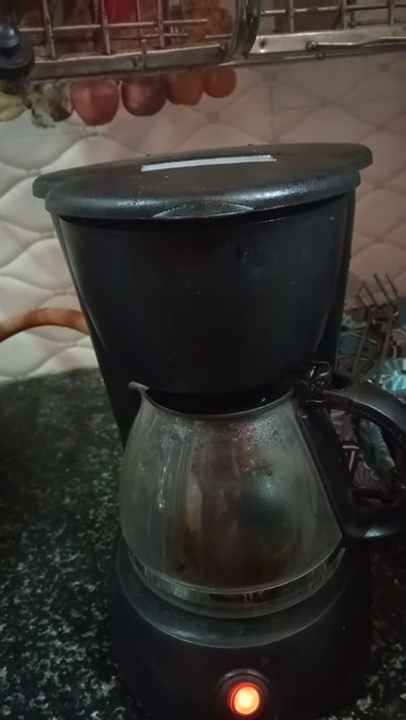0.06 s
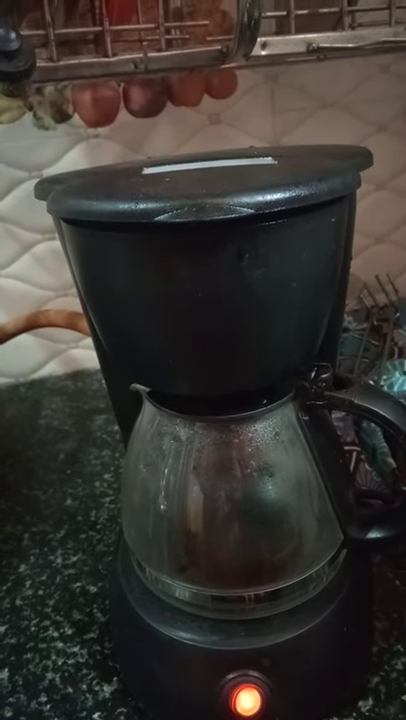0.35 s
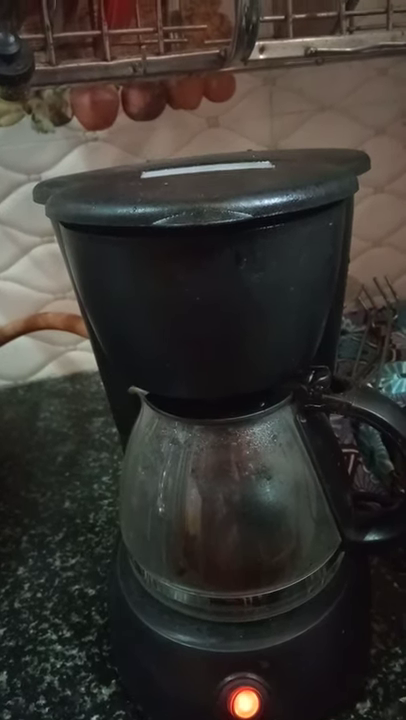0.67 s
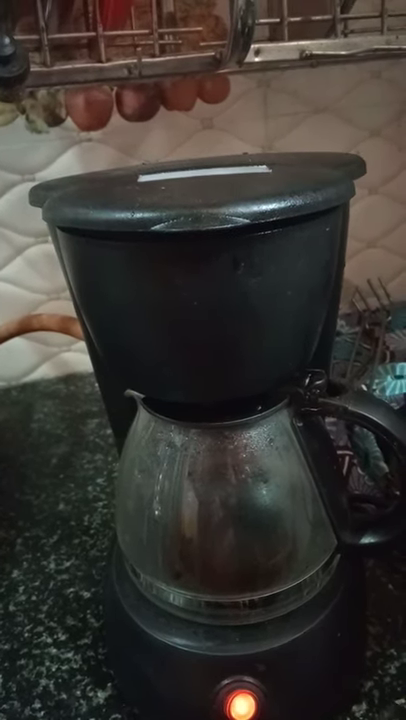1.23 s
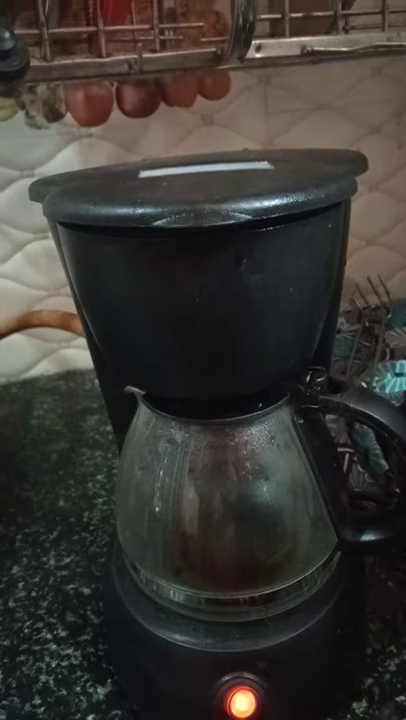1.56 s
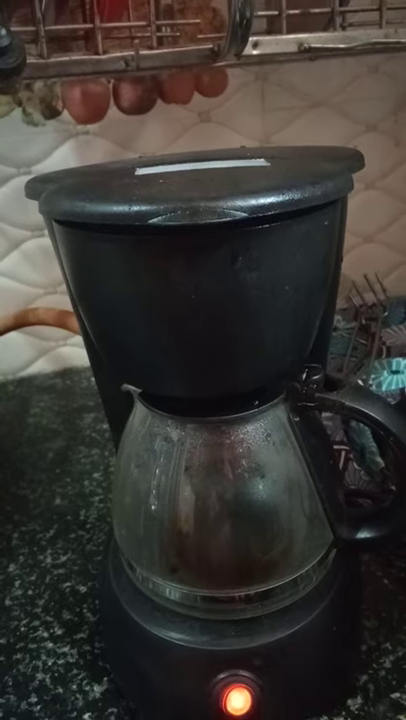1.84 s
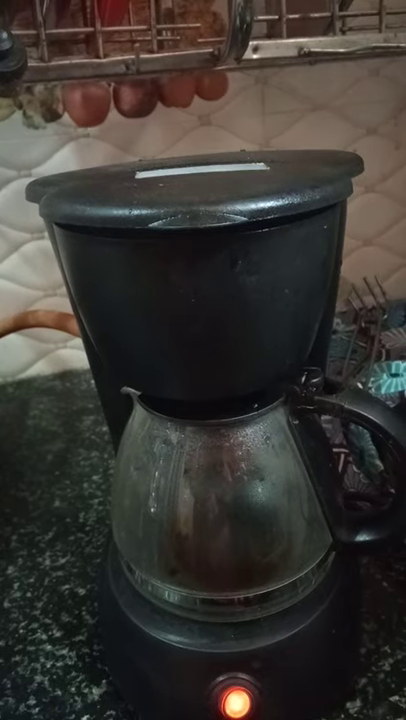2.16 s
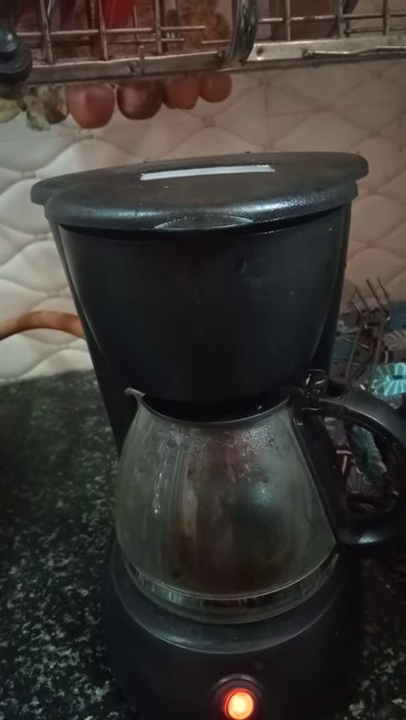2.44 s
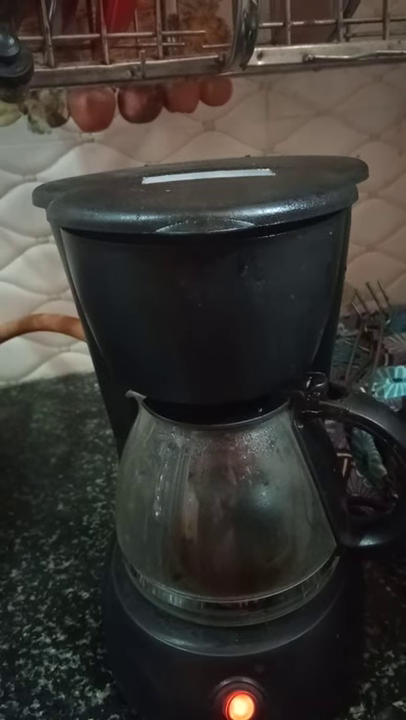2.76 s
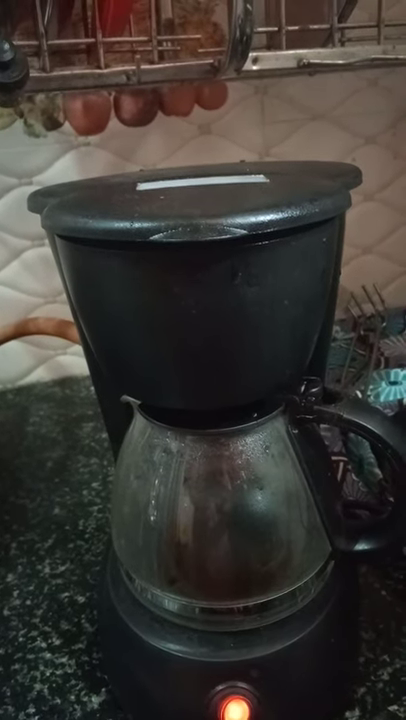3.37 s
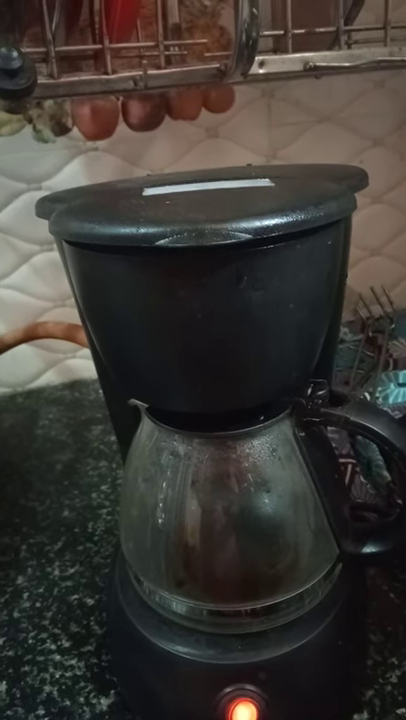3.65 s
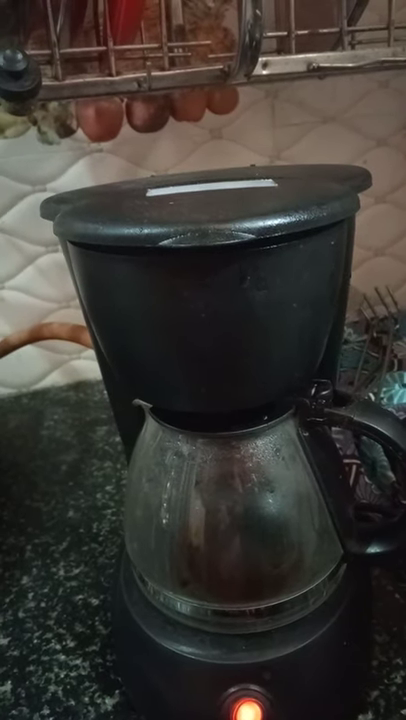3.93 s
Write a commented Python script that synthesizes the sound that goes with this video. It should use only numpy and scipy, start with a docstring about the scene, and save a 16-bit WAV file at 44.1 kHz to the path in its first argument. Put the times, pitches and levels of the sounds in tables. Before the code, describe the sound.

Close, hollow bubbling of a brewing coffee maker, with small spits and soft steam hiss.

```python
"""Quick, uneven gurgling of a drip coffee maker, close by on a kitchen counter.
Steam bubbles burst and ring the hollow plastic housing; splash and froth noise follow their level.
The harder gulps spit through the spout and whistle faintly; now and then a drop sizzles away.
Behind them, steam hisses steadily and the boiling water drones low."""
import sys
import numpy as np
from scipy import signal
from scipy.fft import rfft, irfft
from scipy.io import wavfile

SR = 44100
rng = np.random.default_rng(int(sys.argv[2]) if len(sys.argv) > 2 else 0)


def log_audio(samples):
    """Write samples as a 16-bit WAV file to the path given in sys.argv[1]."""
    # one column per channel
    frames = np.atleast_2d(samples).T
    # limit to full scale, then quantise
    limited = np.clip(frames, -1, 1)
    pcm = np.round(limited * 32767).astype(np.int16)
    wavfile.write(sys.argv[1], SR, pcm)


N = 176400
TIME_S = np.arange(N) / SR

# bursting bubbles (time [s], relative level [dB], boost or cut at BASS_HZ [dB])
BURSTS = [(0.0044, -23.5, 2), (0.039, -21, 5), (0.05, -24.5, 1), (0.1459, -22.5, -8), (0.1607, -26, -7),
          (0.1928, -21, -16), (0.2086, -26, 7), (0.2407, -26.5, 3), (0.2459, -28, 11), (0.2685, -30, 8),
          (0.2852, -27, -4), (0.2968, -23, 11), (0.3411, -24, 2), (0.3507, -23, 1.5), (0.366, -33.5, 3),
          (0.4179, -26.5, 7.5), (0.4442, -27.5, 5.5), (0.476, -24.5, 1.5), (0.496, -27.5, 4),
          (0.511, -28.5, 2), (0.5584, -29, 9), (0.5841, -26, -1), (0.5893, -24, 0), (0.645, -25.5, 4),
          (0.6773, -21, 3.5), (0.702, -28, -5), (0.7801, -21, -13.5), (0.791, -21, 5), (0.804, -33.5, 12),
          (0.8129, -23.5, 10), (0.8266, -32, 10), (0.908, -22.5, 2), (0.9312, -17.5, -7.5),
          (0.945, -25, -1), (0.9861, -27.5, 7), (0.9949, -36, 15), (1.0189, -33, 1), (1.0255, -26, 1),
          (1.0369, -27.5, 9), (1.097, -20.5, -9), (1.1154, -23.5, -2), (1.1235, -28.5, 11),
          (1.1443, -28.5, -2), (1.2283, -23.5, -5), (1.2353, -22, 3), (1.2922, -23, -4),
          (1.3204, -23.5, 3.5), (1.3484, -24.5, 7), (1.3632, -31, 8), (1.395, -32, 10), (1.4064, -29.5, -5),
          (1.4563, -26, -4), (1.4699, -24.5, 2), (1.4845, -19, -2.5), (1.4882, -26, -8), (1.56, -20, 5),
          (1.5929, -28, 0), (1.6408, -25, 5), (1.6552, -25, -12.5), (1.669, -26.5, 4), (1.6872, -25, -12.5),
          (1.701, -29.5, -3), (1.7197, -24, 4), (1.8042, -23, -8), (1.8331, -22, 5), (1.842, -32, 3),
          (1.865, -28.5, 5), (1.8813, -23, -3.5), (1.9007, -32, 8), (1.931, -32.5, 5), (1.956, -22.5, 0.5),
          (2.0356, -23, 12), (2.0478, -23, 5), (2.0667, -30, 10), (2.0721, -27.5, -7), (2.084, -22.5, -7),
          (2.1261, -17.5, -20), (2.1431, -21, 3), (2.157, -31.5, 0), (2.1987, -22, 3), (2.2249, -24.5, 0),
          (2.2589, -31.5, -0.5), (2.2718, -23, 7.5), (2.297, -30, 3), (2.313, -34, 3), (2.3215, -27.5, 7),
          (2.327, -27, -2), (2.3956, -25.5, 4), (2.4137, -24, 8), (2.4486, -22.5, -7), (2.456, -33.5, 13),
          (2.482, -32.5, 5), (2.517, -30.5, 10), (2.524, -40, 6), (2.5843, -24.5, -1), (2.5944, -29, -6),
          (2.6397, -21, 5.5), (2.652, -22.5, -1), (2.6898, -26.5, 5.5), (2.7687, -26, -6), (2.841, -28, -1),
          (2.8573, -26, 10), (2.879, -26.5, -1), (2.8873, -22.5, 5.5), (2.8975, -25.5, -6), (2.938, -30, 0),
          (2.9545, -18.5, -2), (2.9818, -22.5, 0.5), (3.0242, -25, 2.5), (3.0484, -22.5, -1.5),
          (3.0729, -25.5, 4), (3.087, -31.5, -0.5), (3.1055, -27, 3), (3.1197, -22.5, -1.5),
          (3.135, -27, 1), (3.1542, -21.5, 5.5), (3.1693, -29, 3), (3.2209, -23, -1), (3.2588, -25, -6.5),
          (3.2719, -28.5, 2), (3.2851, -25, -1), (3.3149, -28, 10.5), (3.334, -26.0, 9), (3.34, -25.5, -1),
          (3.3565, -24.5, -4), (3.3735, -26, 5), (3.4209, -22, 0.5), (3.4401, -23, -1.5),
          (3.489, -29.5, 6.5), (3.5302, -23.5, -0.5), (3.5776, -26, -4.5), (3.5849, -17, -7),
          (3.6039, -30, 13.5), (3.6187, -24, 5), (3.624, -24, -19), (3.6617, -20.5, -24.5),
          (3.68, -30.5, 5), (3.7177, -24, 7.5), (3.7321, -29.5, 4), (3.7491, -27.5, -7), (3.7708, -26.5, 7),
          (3.87, -21.5, 4.5), (3.8792, -26.5, 8), (3.8966, -24, -3), (3.9205, -21.5, -4), (3.9894, -25, 7),
          (3.9957, -21, 0)]
# housing resonances (frequency [Hz], width [Hz], boost [dB])
HOUSING_MODES = [(158.1, 8.7, 23.5), (279.8, 8.95, 20), (303.8, 23.7, 21.5), (387, 28, 13.5),
                 (456.4, 20.4, 16), (546.5, 53.7, 12.5), (696, 56, 10.5), (805.5, 48.3, 18), (889, 34, 20),
                 (958, 69, 8), (1122, 147, 6), (1249, 67.4, 20), (1775, 100, 18.5)]
# counter and wall echoes (delay [ms], signed gain [ratio])
ECHOES = [(3.26, -.54), (9.09, .27)]
# spout resonances (frequency [Hz], width [Hz], gain [dB])
SPOUT_MODES = [(1854, 15, 6), (2423, 114, -4), (2880, 190, -8), (3350, 56, 3.5), (4300, 55, -4)]
# froth amount (time [s], level re gurgle [dB])
FROTH_LEVELS = [(0, -26), (0.92, -30), (1.15, -35), (1.55, -32), (1.98, -35.5), (2.15, -25.5), (2.35, -33),
                (4, -28.5)]
# froth band (frequency [Hz], relative density [dB])
FROTH_SPECTRUM = [(1600, 0), (2900, 0)]
# wet steam spurts (time [s], relative spit level [dB], relative whistle level [dB])
STEAM_SPURTS = [(0.139, -43, -53), (0.293, -49, -60), (0.505, -49, -44.5), (0.7921, -40.5, -49),
                (0.9294, -43, -62), (1.2335, -39, -48), (1.291, -48, -50), (1.482, -40.5, -43.5),
                (1.717, -45.5, -66.5), (1.832, -40, -55), (2.0744, -47, -49), (2.1271, -46, -64),
                (2.449, -49, -64), (2.64, -43.5, -49),(2.766, -43.5, -67), (2.951, -45, -45.5),
                (3.5862, -45.5, -46), (3.6144, -46, -53), (3.6631, -45, -53), (3.87, -44, -48)]
# sizzling drops (time [s], relative level [dB])
DROPS = [(0.351, -43), (2.2394, -43.5), (3.235, -45), (3.804, -42)]
# sizzle noise (frequency [Hz], relative density [dB])
SIZZLE_SPECTRUM = [(1500, -14), (3300, -4), (5500, 2.5), (8000, -8.5), (11000, -20), (15000, -20)]
# steam flow (time [s], level [dB])
STEAM_LEVELS = [(0, -52.5), (0.8, -52.5), (1.05, -51), (1.35, -51.5), (2.5, -53), (2.9, -51.5)]
# steam hiss (frequency [Hz], relative density [dB])
STEAM_SPECTRUM = [(1500, -38), (1580, -30), (1860, -1), (2000, -35), (2370, -31), (2640, -8.5),
                  (2910, -12.5), (3340, 0.5), (3740, -1.5), (3980, -6), (4400, -1), (5000, -4), (5410, 0),
                  (5940, -3.5), (6700, -2.5), (7100, -8.5), (8050, -9.5), (10600, -3), (11900, -12),
                  (15500, -18)]
# swells of the drone (time [s], level [dB])
DRONE_SWELLS = [(0.04, -45.5), (0.55, -51), (1.0, -54), (1.67, -46), (3.22, -50.5), (3.37, -45)]
# boiling rumble (frequency [Hz], relative density [dB])
RUMBLE_SPECTRUM = [(15, -77), (25, -40), (146, -21.5), (444, -12.5), (615, -16.5), (882, -7.5), (1500, -35),
                   (1950, -50), (3300, -120)]

BASS_HZ, BASS_BASE_WIDTH_HZ = 356.6, 244
NOTE_LOW_HZ, NOTE_HIGH_HZ = 535, 1264
RING_SPREAD_DB, RING_DETUNING = 2.5, .012
SMALL_BUBBLES_PER_S, SPIT_DROPS_PER_S, SPRAY_DROPS_PER_S, DROP_SPREAD_DB = 110, 1500, 700, 4.5
SPIT_GAIN_DB, WHISTLE_GAIN_DB, SIZZLE_GAIN_DB = -9.5, -5.5, -5.5
STEAM_FLICKER_DB = 0.63
DRONE_HZ, DRONE_WANDER_HZ, DRONE_FLOOR_DB, DRONE_WAVER_DB = 162.9, 3.1, -57, 3.5
BOOM_DB, BOOM_SWELL_DB, RUMBLE_DB = -63, 4.5, -49
ROOM_T60_S, ROOM_DELAY_S, ROOM_DB = 0.17, 0.011, -11


def bubbles():
    """Each burst has its own faint note, amount of bass and housing ring; loud ones tend to be thinner."""
    out, pulse = np.zeros(N + SR), signal.unit_impulse(SR // 4)
    draws = rng.uniform(-0.988, 1, (len(BURSTS), 3, len(HOUSING_MODES)))
    for (time_s, db, bass_db), (note, strengths, detunings) in zip(BURSTS, draws):
        note_hz = NOTE_LOW_HZ * (NOTE_HIGH_HZ / NOTE_LOW_HZ) ** abs(note[0])
        burst = boost(pulse, BASS_HZ, BASS_BASE_WIDTH_HZ * from_db(-bass_db / 2), bass_db)
        burst = burst - 2 * resonate(burst, note_hz, width_hz=900)   # all-pass: rounds the attack
        burst = boost(burst, note_hz, width_hz=109, db=6)
        burst = housing_ring(burst, RING_SPREAD_DB * strengths, RING_DETUNING * detunings)
        start = int(time_s * SR)
        out[start:start + len(pulse)] -= from_db(db) * burst
    return out[:N]


def small_bubbles(bursts):
    """Small bubbles trail the bursts and die out in the pauses."""
    activity = cut(bursts ** 2, hz=9, kind="low", order=1)
    pulses = clicks(SMALL_BUBBLES_PER_S * activity / activity.mean(), spread_db=2.5)
    no_offsets = np.zeros(len(HOUSING_MODES))
    return from_db(-39.5) * housing_ring(pulses, no_offsets, no_offsets)


def housing_ring(x, offsets_db, detunings):
    """The housing rings, each mode with its own offset in strength and pitch."""
    for (hz, width_hz, db), offset_db, detuning in zip(HOUSING_MODES, offsets_db, detunings):
        x = boost(x, hz * (1 + detuning), width_hz, db + offset_db)
    return x


def housing(bursts):
    """The hollow body muffles the bursts; counter and wall reflect them."""
    thinned = cut(bursts, hz=170, kind="high", order=2)
    muffled = cut(thinned, hz=1156, kind="low", order=6)
    echoes = sum(gain * np.interp(TIME_S - ms / 1000, TIME_S, muffled, left=0) for ms, gain in ECHOES)
    return from_db(3) * (muffled + echoes)


def splash(body):
    """Water splashes in the spout as hard as the machine gurgles."""
    return from_db(-27) * envelope(body, hz=55.6) * spout(rng.standard_normal(N))


def froth(body):
    """Froth fizzes while bubbles keep coming and settles in the lulls."""
    amount_db = np.interp(TIME_S, *np.transpose(FROTH_LEVELS))
    return from_db(amount_db) * envelope(body, hz=8.3) * colour(rng.standard_normal(N), FROTH_SPECTRUM)


def spurts():
    """Wet steam spits droplets through the spout with a brief, thin whistle."""
    times_s, spit_db, whistle_db = np.transpose(STEAM_SPURTS)
    shape = dict(attack_s=.002, hold_s=.017, t60_s=.045)
    spit = spout(clicks(SPIT_DROPS_PER_S, DROP_SPREAD_DB))
    spit *= puffs(times_s, spit_db + SPIT_GAIN_DB, **shape)
    whistle = rms_one(narrow_noise(N, hz=5440, width_hz=140))
    whistle *= puffs(times_s, whistle_db + WHISTLE_GAIN_DB, **shape)
    return spit + whistle


def spout(x):
    """The narrow spout rings in the treble; rms 1."""
    modes = [from_db(db) * resonate(x, hz, width_hz) for hz, width_hz, db in SPOUT_MODES]
    return rms_one(sum((-1) ** k * mode for k, mode in enumerate(modes)))


def sizzles():
    """Each drop boils away in a short, bright puff."""
    times_s, db = np.transpose(DROPS)
    level = puffs(times_s, db + SIZZLE_GAIN_DB, attack_s=0.0047, hold_s=0.0066, t60_s=0.15)
    return level * colour(rng.standard_normal(N), SIZZLE_SPECTRUM)


def steam():
    """Steam carrying fine spray hisses and swells slightly."""
    jet = rng.standard_normal(N) + 0.48 * clicks(SPRAY_DROPS_PER_S, DROP_SPREAD_DB)
    level_db = np.interp(TIME_S, *np.transpose(STEAM_LEVELS)) + STEAM_FLICKER_DB * drift(hz=19.5)
    return from_db(level_db) * colour(jet, STEAM_SPECTRUM)


def boiling():
    """Boiling water: a wavering, swelling drone, a deeper boom and a soft rumble."""
    phase = 2 * np.pi * np.cumsum(DRONE_HZ + DRONE_WANDER_HZ * drift(hz=15.7)) / SR
    swells = puffs(*np.transpose(DRONE_SWELLS), attack_s=0.016, hold_s=0.033, t60_s=0.17)
    level = np.hypot(from_db(DRONE_FLOOR_DB), swells) * from_db(DRONE_WAVER_DB * drift(hz=5.2))
    drone = level * np.sqrt(2) * np.sin(phase)
    boom = rms_one(narrow_noise(N + SR, hz=112.4, width_hz=21)[SR:])
    boom *= from_db(BOOM_DB + BOOM_SWELL_DB * drift(hz=6.6))
    rumble = from_db(RUMBLE_DB) * colour(rng.standard_normal(N), RUMBLE_SPECTRUM)
    return drone + boom + rumble


def kitchen(x):
    """Hard walls return a short, dense tail."""
    t_s = TIME_S[:SR // 2]
    tail = rng.standard_normal(len(t_s)) * np.exp(-np.log(1000) * t_s / ROOM_T60_S) * (t_s > ROOM_DELAY_S)
    return from_db(ROOM_DB) * signal.fftconvolve(x, tail / np.linalg.norm(tail))[:N]


def from_db(db):
    """Decibels to gain."""
    return 10 ** (np.asarray(db) / 20)


def rms_one(x):
    """Scale to rms 1."""
    return x / np.sqrt(np.mean(x ** 2) + 1e-20)


def cut(x, hz, kind, order):
    """Butterworth low- or high-pass."""
    return signal.sosfilt(signal.butter(order, hz, kind, fs=SR, output="sos"), x + 1e-18)


def envelope(x, hz):
    """Running rms, power low-passed at hz."""
    return np.sqrt(cut(x ** 2, hz, "low", order=1))


def boost(x, hz, width_hz, db):
    """Peaking filter."""
    a, c, gain = np.pi * width_hz / SR, -2 * np.cos(2 * np.pi * hz / SR), from_db(db)
    return signal.lfilter([1 + a * gain, c, 1 - a * gain], [1 + a, c, 1 - a], x + 1e-18)


def resonate(x, hz, width_hz):
    """Band-pass, peak gain 1."""
    a, c = np.pi * width_hz / SR, -2 * np.cos(2 * np.pi * hz / SR)
    return signal.lfilter([a, 0, -a], [1 + a, c, 1 - a], x + 1e-18)


def narrow_noise(samples, hz, width_hz):
    """White noise through two equal band-passes."""
    return resonate(resonate(rng.standard_normal(samples), hz, width_hz), hz, width_hz)


def colour(x, spectrum):
    """Apply a spectrum, rolled off beyond its ends; rms 1."""
    hz, db = np.transpose(spectrum)
    bins_hz = np.maximum(np.arange(N // 2 + 1) * SR / N, 1)
    skirts = (np.minimum(bins_hz / hz[0], 1) * np.minimum(hz[-1] / bins_hz, 1)) ** 4
    gain = from_db(np.interp(np.log(bins_hz), np.log(hz), db))
    return rms_one(irfft(rfft(x) * skirts * gain, N))


def drift(hz):
    """Low-passed noise; rms 1."""
    return rms_one(cut(rng.standard_normal(N + SR), hz, "low", order=2)[SR:])


def clicks(per_s, spread_db):
    """Random clicks of uneven size and either sign."""
    sizes = from_db(spread_db * np.minimum(rng.exponential(1, N), 4))
    return (rng.random(N) < per_s / SR) * sizes * rng.choice([-1, 1], N)


def puffs(starts_s, levels_db, attack_s, hold_s, t60_s):
    """Attack-hold-release envelopes, summed in power."""
    power = np.zeros(N)
    for start_s, db in zip(starts_s, levels_db):
        age_s = TIME_S - start_s
        attack = np.clip(age_s / attack_s, 0, 1)
        release = np.exp(-np.log(1000) * np.clip((age_s - attack_s - hold_s) / t60_s, 0, 10))
        power += (from_db(db) * attack * release) ** 2
    return np.sqrt(power)


def scene():
    """The gurgling machine in its kitchen; mono."""
    bursts = bubbles()
    body = housing(bursts + small_bubbles(bursts))
    gurgle = body + splash(body) + froth(body) + spurts()
    return (gurgle + kitchen(gurgle) + sizzles() + steam() + boiling())[None]


def record(dry):
    """Steep low-pass at 15.7 kHz."""
    return signal.sosfilt(signal.ellip(12, .1, 80, 15700, fs=SR, output="sos"), dry)


dry = scene()
out = record(dry)
log_audio(out)
```